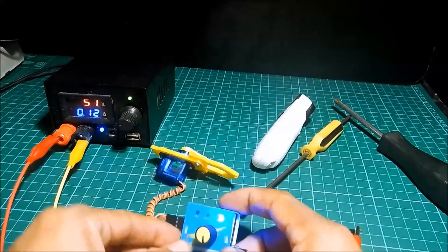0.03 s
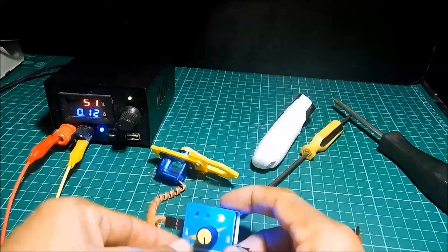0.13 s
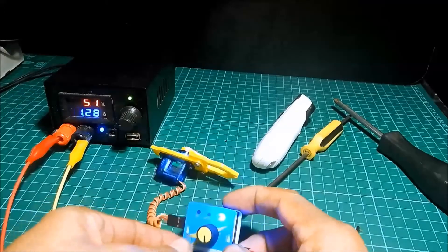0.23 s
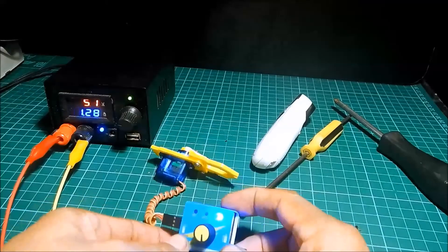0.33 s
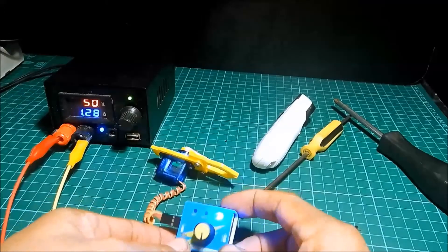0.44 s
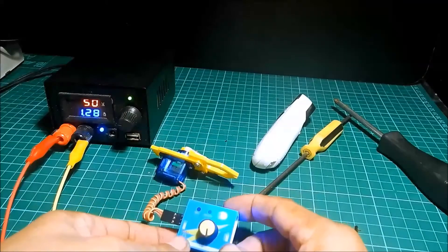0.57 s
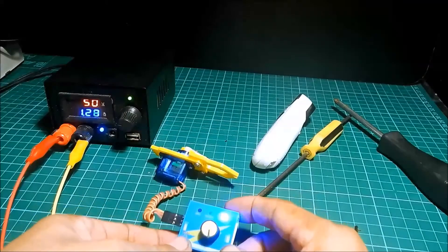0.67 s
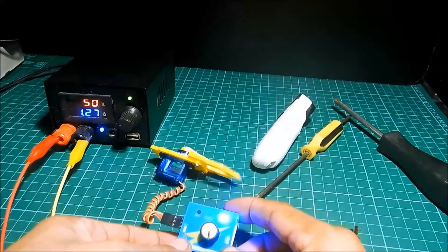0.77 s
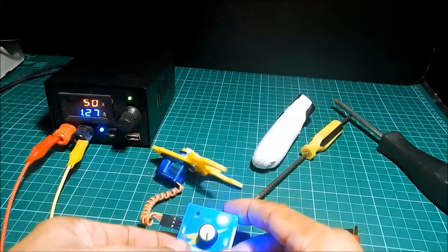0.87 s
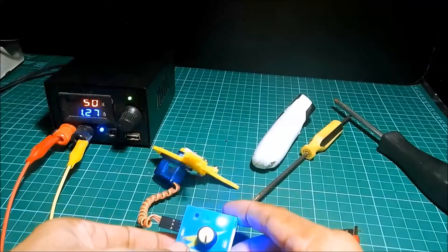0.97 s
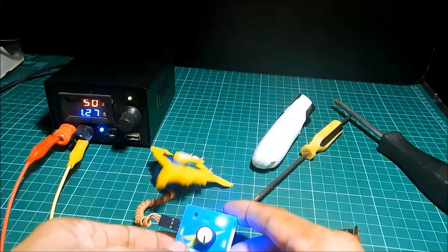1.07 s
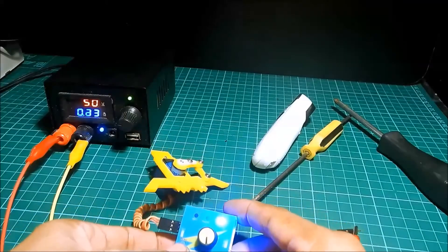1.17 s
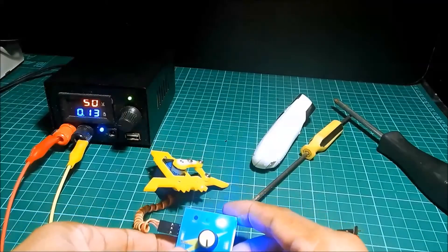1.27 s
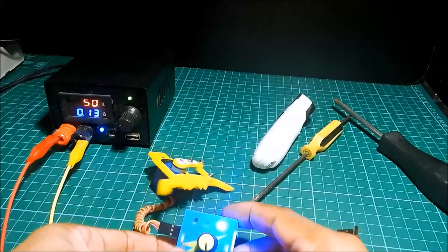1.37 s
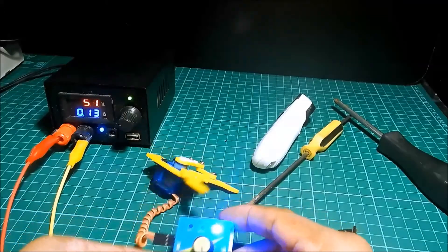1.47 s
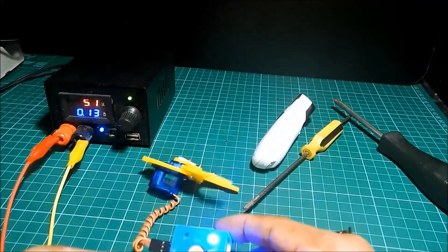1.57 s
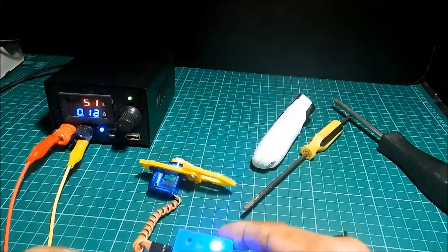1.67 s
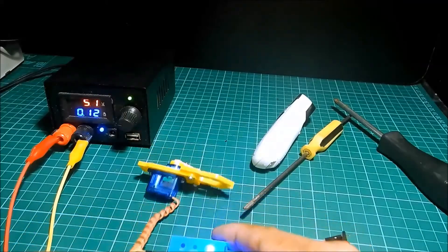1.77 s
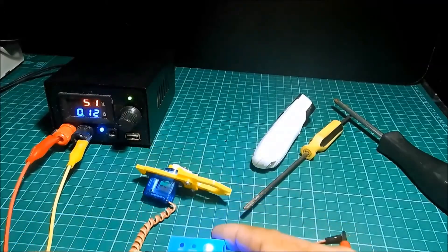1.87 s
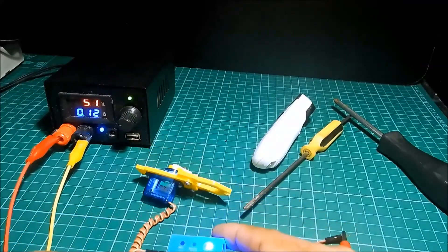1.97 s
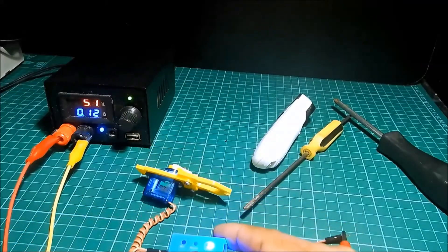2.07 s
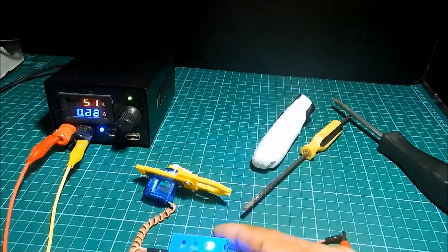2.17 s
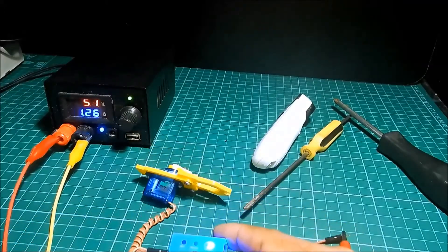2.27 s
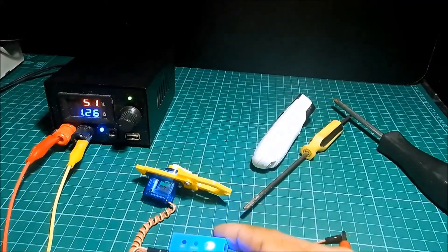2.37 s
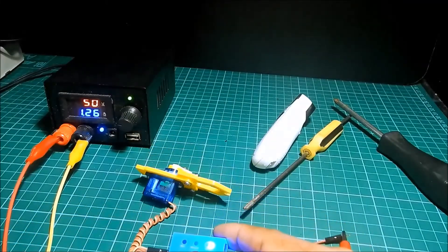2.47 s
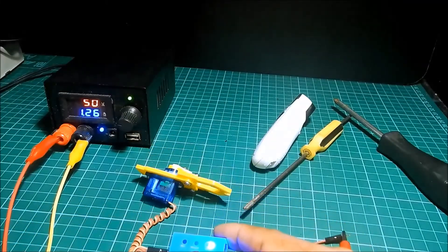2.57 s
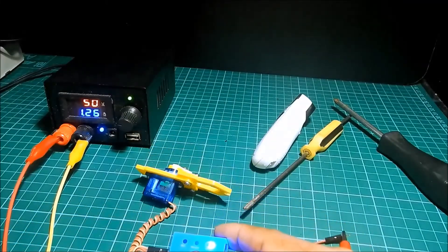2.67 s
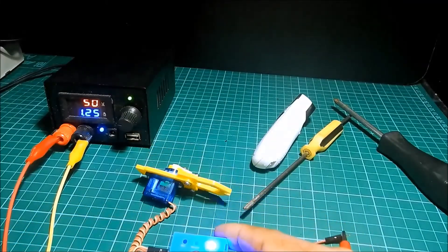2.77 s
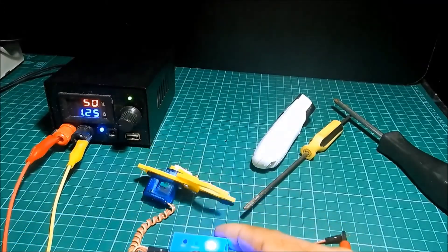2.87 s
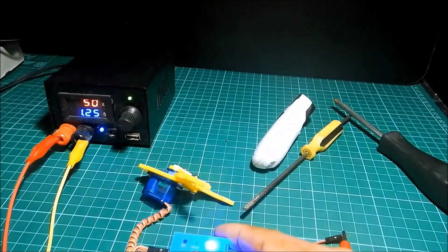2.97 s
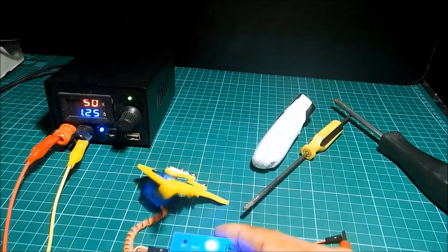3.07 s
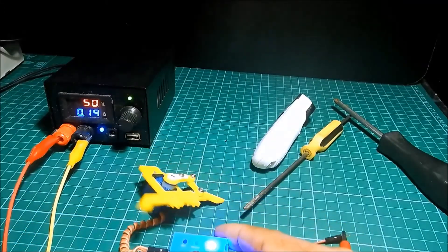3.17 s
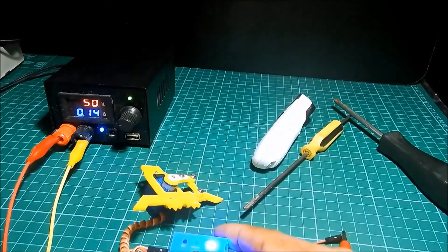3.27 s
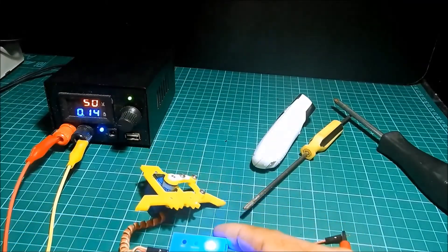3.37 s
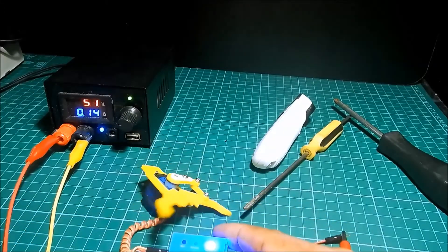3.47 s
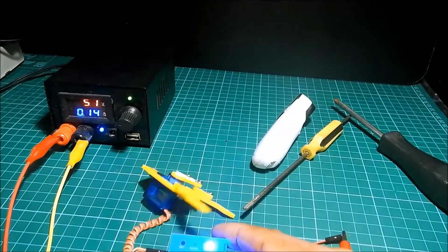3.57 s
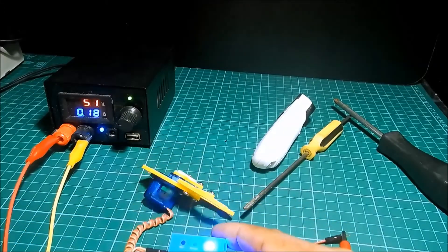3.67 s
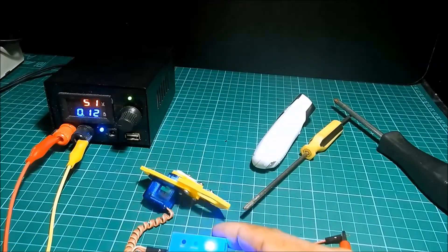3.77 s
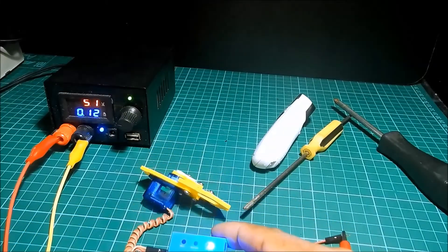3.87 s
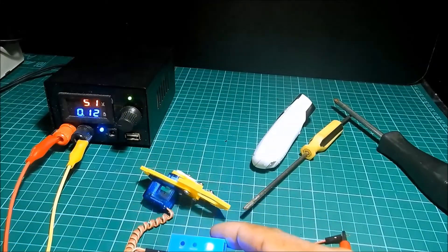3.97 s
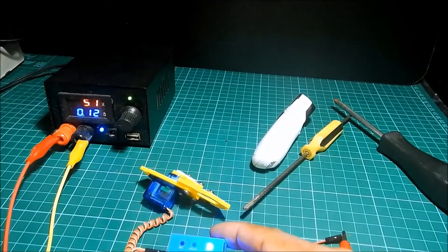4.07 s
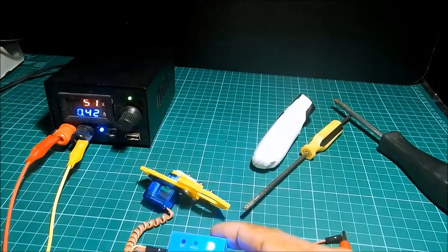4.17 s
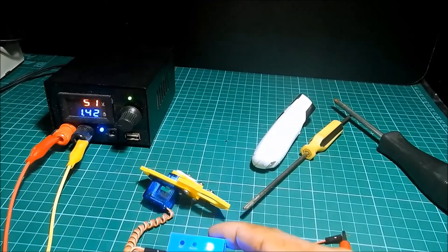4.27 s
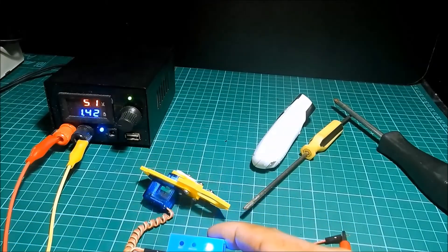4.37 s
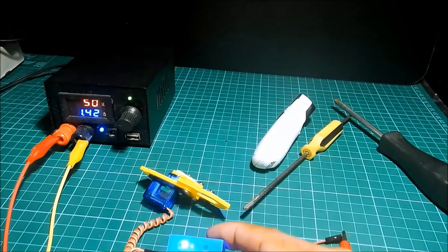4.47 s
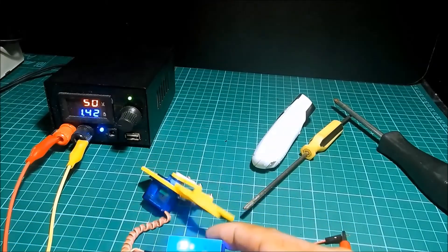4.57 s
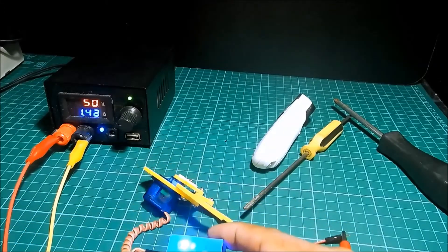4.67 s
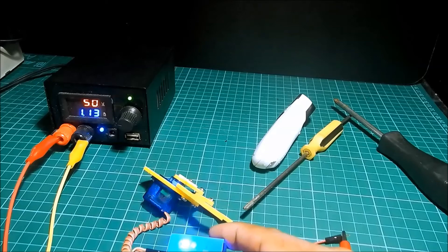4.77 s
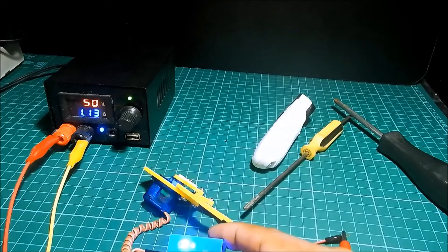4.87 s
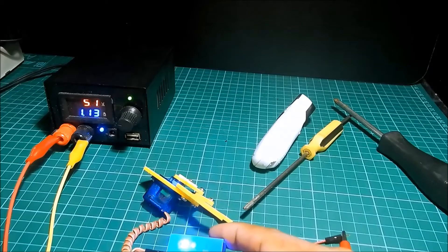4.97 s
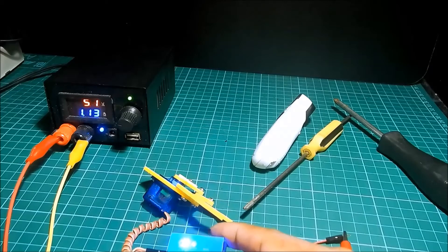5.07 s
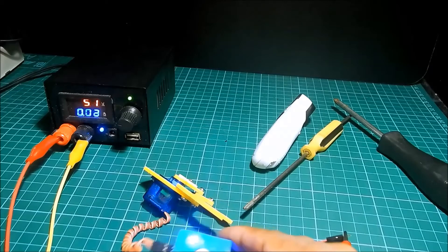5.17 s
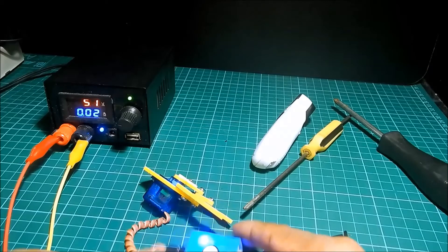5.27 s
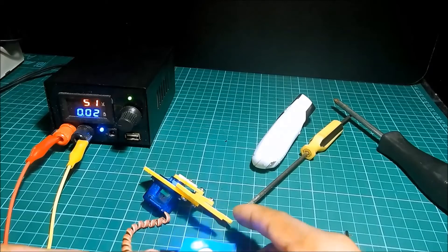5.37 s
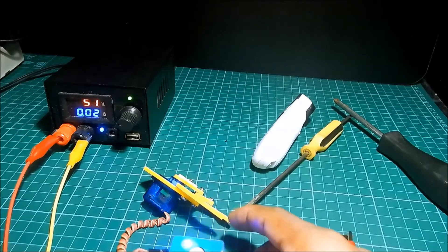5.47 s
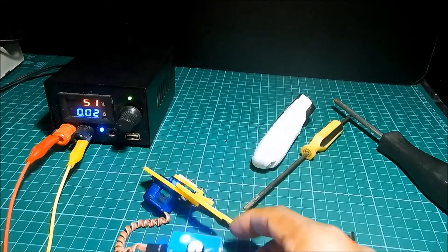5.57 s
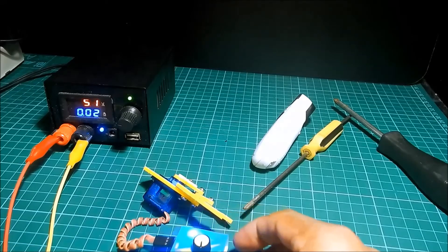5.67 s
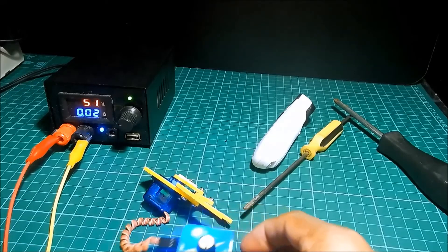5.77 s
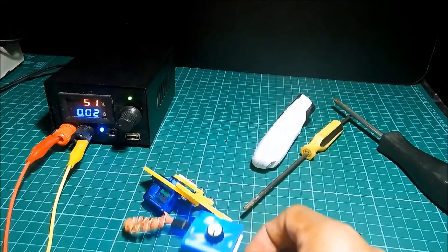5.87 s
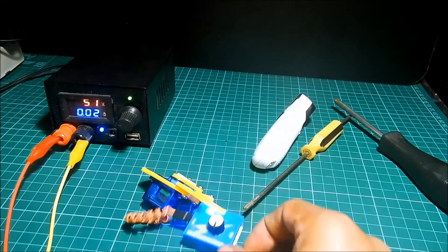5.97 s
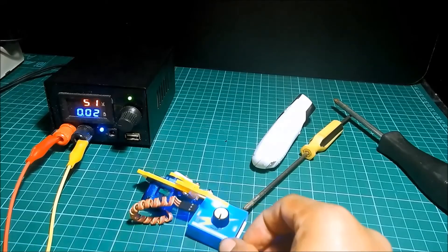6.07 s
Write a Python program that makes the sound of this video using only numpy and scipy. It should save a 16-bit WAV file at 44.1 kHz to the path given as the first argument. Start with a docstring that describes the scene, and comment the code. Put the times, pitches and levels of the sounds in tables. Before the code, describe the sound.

Short raspy gear whirs and plastic clacks from a small motorised gripper on a matted bench, with finger ticks and a faint fan hum.

```python
"""A hobby servo opens and shuts a plastic gripper on a mat-covered bench, near the middle of a stereo microphone.
Its gears are dense random tooth contacts ringing the case, with scrapes and scuffs on the mat.
Jaws snap and fingers tick on a control box as struck plastic modes; soft pushes knock through the bench.
Fingers rustle as filtered grit. A small quiet room answers with dying noise; a supply fan, room noise
and a wavering low hum, all shaped random noise, lie underneath."""
import sys
import numpy as np
from scipy import signal
from scipy.fft import rfft, irfft
from scipy.io import wavfile

SR = 44100
rng = np.random.default_rng(int(sys.argv[2]) if len(sys.argv) > 2 else 0)


def waveform_to_disk(signal):
    """Save audio, clipped to [-1, 1], as 16-bit WAV at the path in sys.argv[1]."""
    frames = np.transpose(np.atleast_2d(signal))
    scaled = np.clip(frames, -1, 1) * 32767
    samples = np.round(scaled).astype(np.int16)
    wavfile.write(sys.argv[1], SR, samples)


N = 269887
T = np.arange(N) / SR
HZ = np.maximum(np.fft.rfftfreq(N + 4096, 1 / SR), 10)

# Fan and room noise. Each row: frequency in Hz, relative level in dB per Hz.
AIR_SPECTRUM = [(21, -32.5), (35, -2.5), (108, -3.5), (216, -6.5), (490, -17), (602, -19), (840, -19),
                (979, -19), (1590, -19), (2800, -33), (4010, -32.5), (4680, -30.5), (6520, -49.5),
                (16000, -68)]
# Resonances of the fan housing. Each row: frequency in Hz, width in Hz, boost in dB.
HOUSING_PEAKS = [(511, 81, 5.5), (815, 26.6, 5), (1656, 130, 5.5), (2760, 380, 14), (4810, 560, 4)]
# How alike the air noise is left and right. Each row: frequency in Hz, likeness (below 0 is taken as 0).
AIR_LIKENESS = [(60, 0.71), (180, 0.5), (550, 0.51), (1650, 0.78), (4970, -0.12), (15000, -0.03)]
# Lean of the air noise. Each row: frequency in Hz, left minus right in dB.
AIR_BALANCE = [(60, -9), (240, -5), (950, -2.5), (3770, 2.5), (15000, -3)]
# Wavering low hum. Each row: time in seconds, level in dB.
HUM_LEVEL = [(0, -81), (.45, -78), (.7, -55), (.87, -54.5), (1.05, -60.5), (1.3, -50), (1.5, -59.5),
             (1.62, -56), (1.85, -59.5), (2.45, -73.5), (2.74, -60), (3.12, -68), (3.46, -51.5),
             (4.25, -57), (4.6, -59.5), (4.96, -57.5), (5.25, -52), (5.45, -53.5), (5.75, -62.5),
             (6.12, -55)]
# Spacing of the microphone ports. Each row: frequency in Hz, lead of the left port in radians.
PORT_LEAD = [(500, .05), (3000, .4), (6500, .6), (8500, 1.2), (12000, 1.4), (16000, 1.4)]
# Fingers rustling. Each row: start in seconds, end in seconds, level in dB, brightest pitch in Hz.
RUSTLES = [(0, 0.122, -68, 4720), (0.155, 0.18, -72.5, 5330), (4.274, 4.423, -70, 4820),
           (4.28, 4.356, -75.5, 3470), (4.806, 4.957, -73, 4300), (5.19, 5.225, -74, 4930),
           (5.295, 5.355, -71, 4300), (5.424, 5.6, -67.5, 4720), (5.598, 5.76, -79.5, 5600),
           (5.855, 5.986, -70.5, 5070), (6.03, 6.12, -69.5, 4270)]
# Colour of skin grit. Each row: frequency in Hz, relative level in dB per Hz.
RUSTLE_SPECTRUM = [(1470, -66), (2500, 1.5), (3340, 5), (3840, -8), (4780, -13), (5130, -12.5), (6280, -19),
                   (9000, -58), (11700, -70), (19800, -120)]
# Knocks through the bench. Each row: start in seconds, peak in dB before the bass cut, pitch in Hz.
KNOCKS = [(0.278, -39, 214), (.866, -38, 174), (.9, -34.5, 285), (0.967, -43, 221), (1.194, -30, 216),
          (1.237, -29, 238), (1.266, -36, 192), (1.407, -36, 176), (1.519, -39, 194), (1.617, -33.5, 191),
          (1.669, -37, 236), (1.703, -31.5, 235), (1.782, -32.5, 208), (1.738, -42, 230), (1.812, -41, 215),
          (1.901, -40, 213), (1.936, -38, 202), (2.68, -47, 407), (2.7, -44.5, 180), (2.922, -39, 256),
          (2.952, -34.5, 245), (2.985, -35.5, 189), (3.029, -39.5, 188), (3.231, -36.5, 236),
          (3.275, -26, 217), (3.309, -58, 218), (3.463, -38.5, 210), (3.639, -39.5, 190), (3.672, -33, 198),
          (3.752, -31.5, 233), (3.89, -41, 189), (4.624, -27.5, 232), (4.678, -31, 213),
          (4.718, -27.5, 186), (4.771, -44.5, 183), (5.397, -39, 180)]
# Fingers on the control box. Each row: contact in seconds, peak in dB, brightest pitch in Hz.
TICKS = [(.2379, -45, 1540), (.2578, -44.5, 2280), (.28, -44, 2320), (.5756, -54.5, 4330),
         (.7776, -50.5, 2770), (4.458, -51, 4860), (5.386, -39.5, 2500), (5.404, -46, 2480),
         (5.449, -38, 3400), (5.481, -45, 3440), (5.5024, -49, 3540), (5.709, -51, 3460),
         (5.854, -51, 4500), (5.899, -52, 4520), (6.0288, -36.5, 3000), (6.0399, -40, 3320)]
# Modes of the control box. Each row: frequency in Hz, level in dB, undamped T60 in seconds.
BOX_MODES = [(1200, -21, 0.0023), (1530, 10.5, 0.00375), (2210, -13, 0.013), (2640, 10, 0.0046),
             (3180, 0.5, 0.019), (3560, 7.5, 0.0063), (4550, 3, 0.011), (4860, 0.5, 0.0095),
             (6250, -51, 0.0014), (7600, -30, .003), (11500, -36.5, 0.0025)]
# Push button of the box, a hard click. Each row: contact in seconds, peak in dB, a pitch in Hz (no effect).
BUTTON_PRESSES = [(4.571, -10.5, 4000)]
# Modes of the button cap. Each row: frequency in Hz, level in dB, T60 in seconds.
BUTTON_MODES = [(1950, -7.5, 0.0089), (2750, -9, 0.0065), (3400, -4.5, 0.0087), (3950, 1, 0.006),
                (4800, 1, 0.0042), (5600, -8.5, 0.0053), (7500, -25.5, .003), (11500, -21.5, 0.0022)]
# Jaws snapping. Each row: contact in seconds, peak in dB, brightest pitch in Hz.
SNAPS = [(.9022, -18, 1750), (.9682, -38.5, 1400), (1.1943, -39, 1490), (1.2362, -38.5, 1180),
         (1.2594, -36.5, 3000), (1.405, -39, 1390), (1.617, -43.5, 1260), (1.7005, -29.5, 1800),
         (2.9542, -16, 1810), (3.025, -41, 1200), (3.126, -43.5, 1500), (3.2728, -37, 1120),
         (3.3025, -39.5, 2890), (3.677, -45, 1400), (3.7558, -33.5, 1940), (3.8338, -29.5, 4320),
         (4.6353, -7.5, 2230), (4.715, -27, 1620), (4.721, -23.5, 4060)]
# Modes of the jaws. Each row: frequency in Hz, level in dB, undamped T60 in seconds.
JAW_MODES = [(556, -14, 0.06), (820, -10, 0.02), (1160, -5.5, 0.02), (1493, 7, 0.02), (1820, 3.5, 0.013),
             (2550, 9.5, 0.0049), (2765, -4, 0.041), (3580, 13.5, 0.0054), (4120, -3.5, 0.012),
             (4510, 5, 0.031), (5340, -27, .01), (7000, -29, .01)]
# Servo moves. Each row: full speed in seconds, stop in seconds, whir in dB at start and at stop,
# lower case resonance in Hz at start and at stop, upper one in Hz at start and at stop, upper level in dB,
# gear hiss in dB against the whir, scrape of the jaws in dB, scuff of the case in dB.
MOVES = [(0.838, 1.25, -50, -58.5, 5020, 4830, 6585, 6800, 0.5, -4, -67, -83),
         (1.387, 1.795, -52.5, -48, 4920, 4930, 6710, 6490, -1.5, -6.5, -65.5, -60.5),
         (2.887, 3.312, -54, -52.5, 4880, 4660, 6340, 6700, -8.5, -6, -69, -82),
         (3.437, 3.86, -54, -50.5, 4750, 4800, 6560, 6630, -4.5, -5, -62.5, -68),
         (4.616, 4.701, -55.5, -49, 4840, 4700, 7000, 4200, -6, -1, -52.5, -66)]
# Gears straining for an instant. Each row: middle in seconds, level in dB, length in seconds,
# bright bite of the loaded teeth in dB against that level.
STRAINS = [(.84, -56, 0.04, -32), (0.876, -35.5, 0.027, -23), (.933, -47.5, 0.014, -33),
           (0.949, -58, .02, -31), (1.025, -58.5, 0.033, -42), (1.18, -54.5, 0.058, -35),
           (1.274, -54, .05, -28), (1.408, -60.5, 0.056, -37), (1.52, -56, 0.054, -44),
           (1.761, -43.5, 0.011, -40), (1.786, -44, .02, -16), (2.89, -49, 0.043, -45),
           (2.93, -39, 0.051, -40), (2.996, -48.5, 0.044, -34), (3.047, -54, 0.012, -33),
           (3.095, -61, 0.024, -32), (3.133, -53.5, 0.04, -30), (3.168, -47, 0.024, -30),
           (3.201, -46, 0.0077, -33), (3.328, -58, 0.033, -20), (3.461, -49.5, 0.032, -36),
           (3.585, -58, 0.056, -30), (3.81, -46, 0.039, -36), (3.842, -40.5, .022, -14.5),
           (3.854, -47.5, 0.0087, -26), (4.605, -39, .024, -20), (4.63, -31.5, 0.036, -15),
           (4.721, -41.5, 0.023, -19)]
# Weaker case resonances, lying flat and then shifted on the mat.
# Each row: frequency in Hz, width of each smoothing in Hz, level in dB.
CASE_FLAT = [(3430, 300, -14), (4300, 500, -13), (5600, 300, -11), (7950, 400, -19)]
CASE_SHIFTED = [(3450, 400, -16), (5450, 300, -11), (6900, 250, -14), (7700, 600, -18)]
# Broad hiss of the gears. Each row: frequency in Hz, relative level in dB per Hz.
GEAR_HISS = [(1500, -11), (2500, -8), (4000, -3.5), (7000, -4), (8300, -16.5), (9800, -21.5), (12500, -34),
             (15500, -34)]
# The whole servo skidding on the mat. Each row: start in seconds, end in seconds, bright scrape in dB,
# dull scuff in dB.
SKIDS = [(0.88, 0.914, -59, -53.5), (1.874, 1.944, -56, -51.5), (2.528, 2.576, -66.5, -74),
         (2.708, 2.713, -58, -57), (3.28, 3.33, -75, -55.5)]
# Colours of scrape and scuff on the mat. Each row: frequency in Hz, relative level in dB per Hz.
SCRAPE_SPECTRUM = [(550, -2), (1020, -7), (1450, 6), (1900, -3.5), (2500, -20), (3500, -12.5),
                   (8000, -77.5)]
SCUFF_SPECTRUM = [(90, -38.5), (230, 15), (340, 8), (420, -19), (600, 1), (900, -27), (4000, -76)]

AIR_DB, HUM_HZ, HUM_T60_S = -56, 143, 1.3 / 24
ROOM_T60_S, ROOM_DB, GEAR_ROOM_DB = 0.29, -16.5, -17.5
WALL_CUT_HZ, GEAR_WALL_CUT_HZ = 2000, 12000
CUTOFF_HZ = 16000   # 70 dB down from here up
RUSTLE_IN_DB_PER_S, RUSTLE_OUT_DB_PER_S, RUSTLE_WIDTH_HZ = 206.5, 88.5, 900
BENCH_T60_S, BENCH_CUT_HZ = 0.049, 176
STRIKE_DELAY_S = 0.001222   # from contact to the start of the sound
SPIN_UP_DB_PER_S, RUN_DOWN_DB_PER_S = 701, 227
SKID_IN_DB_PER_S, SKID_OUT_DB_PER_S = 208.5, 314
TEETH_PER_S, DRIVE_HZ, DRIVE_DEPTH_DB = 1900, 48.8, 2.5
LOWER_WIDTH_HZ, UPPER_WIDTH_HZ, WANDER_HZ = 330, 180, 50
SHIFT_S = 2.4   # the case lies differently from here on


def from_db(db):
    """Decibels to gain."""
    return 10 ** (np.asarray(db) / 20)


def rms_one(x):
    """Scale a sound to unit rms."""
    return x / np.sqrt(np.mean(x ** 2) + 1e-20)


def in_time(rows):
    """Read each column of a curve at every sample."""
    s, *columns = np.transpose(rows)
    return [np.interp(T, s, c) for c in columns]


def at_hz(points):
    """Read a spectrum table on the frequency grid, along log frequency."""
    hz, values = np.transpose(points)
    return np.interp(np.log(HZ), np.log(hz), values)


def colour(x, gain):
    """Filter a sound by a gain on the frequency grid."""
    return irfft(rfft(x, N + 4096) * gain, N + 4096)[..., :N]


def drift(rate_hz):
    """Slow random wandering of spread 1: noise smoothed by two equal poles."""
    r = np.exp(-2 * np.pi * rate_hz / SR)
    noise = rng.standard_normal(N + SR)
    return rms_one(signal.lfilter([1], [1, -2 * r, r * r], noise)[SR:])


def ring(x, hz, t60):
    """A damped mode: a unit click sets a sine of height 1 ringing, for a T60 of at least 2 ms."""
    r, w = from_db(-60 / (max(t60, .002) * SR)), 2 * np.pi * hz / SR
    return signal.lfilter([0, np.sin(w)], [1, -2 * r * np.cos(w), r * r], x)


def moving_ring(x, hz, width_hz):
    """A steep resonance of gain 1 whose centre follows a curve: shift down, smooth twice, shift back."""
    turn = np.exp(2j * np.pi * np.cumsum(hz) / SR)
    r = np.exp(-np.pi * width_hz / SR)
    smooth = signal.lfilter([(1 - r) ** 2], [1, -2 * r, r * r], x / turn)
    return 2 * (smooth * turn).imag


def swell(start, stop, in_db_per_s, out_db_per_s):
    """Gain that rises to 1 at start, holds, and dies away after stop."""
    before, after = np.maximum(start - T, 0), np.maximum(T - stop, 0)
    return from_db(-in_db_per_s * before - out_db_per_s * after)


def grit(per_s, spread_db):
    """Dense tiny contacts of uneven size and random sign, at random moments."""
    sizes = from_db(spread_db * np.minimum(rng.exponential(1, N), 4))
    signs = rng.choice([-1, 1], N)
    return sizes * signs * (rng.random(N) < per_s / SR)


def add(out, s, sound):
    """Mix a sound in from time s."""
    i = round(s * SR)
    out[i:i + len(sound)] += sound[:N - i]


def lean_right(x, db):
    """Place a sound off centre: down by db on the left, up by db on the right."""
    return x * from_db([[-db], [db]])


def background():
    """Fan and room noise spread wide by its left-right likeness, over a narrow noise band as hum."""
    mid, side = rng.standard_normal((2, N))
    alike = np.clip(at_hz(AIR_LIKENESS), 0, 1)
    mid, side = colour(mid, np.sqrt(1 + alike)), colour(side, np.sqrt(1 - alike))
    housing_db = sum(db / (1 + (2 * (HZ - hz) / width) ** 2) for hz, width, db in HOUSING_PEAKS)
    gain = from_db(at_hz(AIR_SPECTRUM) + housing_db)
    lean = from_db(at_hz(AIR_BALANCE) / 2 * np.array([[1], [-1]]))
    air = rms_one(colour(np.array([mid + side, mid - side]), gain * lean))
    hum_db, = in_time(HUM_LEVEL)
    hum = rms_one(ring(rng.standard_normal(N), HUM_HZ, HUM_T60_S))
    return from_db(AIR_DB) * air + from_db(hum_db) * hum


def room(x, cut_hz):
    """The walls answer with dying noise, partly shared between left and right, dulled above the cut."""
    t = T[:round(SR * .8)]
    envelope = from_db(-60 * t / ROOM_T60_S) * (1 - np.exp(-t / 0.0011))
    tail = rng.standard_normal((2, len(t))) * envelope
    tail = signal.sosfilt(signal.butter(1, [150, cut_hz], "band", fs=SR, output="sos"), tail)
    shared = tail + 0.56 * tail[::-1]
    shared = shared / np.sqrt((shared ** 2).sum(axis=1, keepdims=True))
    return signal.fftconvolve(x[None], shared, axes=1)[:, :N]


def fingers():
    """Fine grit under skin; each rustle passes a resonance at a pitch of its own."""
    grains = grit(3000, spread_db=1.5) * from_db(1.5 * drift(18))
    grains = colour(grains, from_db(at_hz(RUSTLE_SPECTRUM)))
    out = np.zeros(N)
    for start, end, db, hz in RUSTLES:
        rustle = rms_one(moving_ring(grains, np.full(N, hz), RUSTLE_WIDTH_HZ))
        out += from_db(db) * swell(start, end, RUSTLE_IN_DB_PER_S, RUSTLE_OUT_DB_PER_S) * rustle
    return out


def bench():
    """Soft pushes of about half a cycle ring the bench top, which radiates no deep bass."""
    out = np.zeros(N)
    for s, peak_db, hz in KNOCKS:
        push = np.pad(np.hanning(round(SR / hz * 0.55)), (0, SR // 4))
        sound = ring(push, hz, BENCH_T60_S)
        add(out, s, from_db(peak_db) * sound / np.abs(sound).max())
    return signal.sosfilt(signal.butter(4, BENCH_CUT_HZ, "high", fs=SR, output="sos"), out)


def strikes(events, modes, rattle_db, rattle_s, focus_db, damping, cut_hz):
    """A sharp contact and a dying rattle strike plastic modes; focus_db favours those near the brightest pitch."""
    out, t = np.zeros(N), T[:SR // 10]
    # small, yielding parts: no bass, no extreme treble
    soft = signal.butter(2, [480, cut_hz], "band", fs=SR, output="sos")
    for s, peak_db, bright_hz in events:
        force = from_db(rattle_db) * rng.standard_normal(len(t)) * np.exp(-t / rattle_s)
        force[0] = -1
        sound = np.zeros(len(t))
        for k, (hz, db, t60) in enumerate(modes):
            octaves_off = np.log2(hz / bright_hz)
            level_db = db + rng.normal(0, 1.5) - focus_db * octaves_off ** 2
            sound += (-1) ** k * from_db(level_db) * ring(force, hz, t60 / damping)
        sound = signal.sosfilt(soft, sound)
        add(out, s + STRIKE_DELAY_S, from_db(peak_db) * sound / np.abs(sound).max())
    return out


def control_box():
    """Fingertips strike the damped box, and the push button clicks with a less damped, brighter cap."""
    ticks = strikes(TICKS, BOX_MODES, rattle_db=-13, rattle_s=.0021, focus_db=8, damping=1.1, cut_hz=6000)
    return ticks + strikes(BUTTON_PRESSES, BUTTON_MODES, rattle_db=-20, rattle_s=.0017,
                           focus_db=0, damping=1, cut_hz=12000)


def gripper_jaws():
    """The plastic jaws snap: brief contacts with a short rattle on damped modes."""
    return strikes(SNAPS, JAW_MODES, rattle_db=-21.5, rattle_s=0.0047, focus_db=4.5, damping=1.5, cut_hz=6000)


def case_modes(teeth, modes):
    """Fixed weaker resonances of the case, rung by the teeth."""
    return sum(from_db(db) * moving_ring(teeth, np.full(N, hz), width) for hz, width, db in modes)


def servo():
    """Tooth contacts, pushed by the drive pulses, ring the case; jaws and case rub on the mat."""
    start, stop, db_a, db_b, low_a, low_b, up_a, up_b, up_db, hiss_db, scrape_db, scuff_db = np.transpose(MOVES)
    pairs = ((start, stop), (db_a, db_b), (low_a, low_b), (up_a, up_b), (up_db, up_db), (hiss_db, hiss_db))
    curves = [np.ravel(pair, "F") for pair in pairs]   # start and stop values in turn
    whir_db, lower_hz, upper_hz, upper_db, hiss_db = in_time(np.transpose(curves))
    moving = np.array([swell(a, b, SPIN_UP_DB_PER_S, RUN_DOWN_DB_PER_S) for a, b in zip(start, stop)])
    whir = from_db(whir_db) * moving.sum(axis=0)

    strain, bite = np.zeros(N), np.zeros(N)
    for s, db, length, bite_db in STRAINS:
        hump = np.hanning(round(length * SR))
        add(strain, s - length / 2, from_db(db) * hump)
        add(bite, s - length / 2, from_db(db + bite_db) * hump)

    drive = from_db(DRIVE_DEPTH_DB * np.sin(2 * np.pi * DRIVE_HZ * T) + 1.3 * drift(6.4))
    teeth = grit(TEETH_PER_S, spread_db=-2.0) * drive
    case = moving_ring(teeth, lower_hz + WANDER_HZ * drift(5.1), LOWER_WIDTH_HZ)
    case -= moving_ring(teeth, upper_hz + WANDER_HZ * drift(8.75), UPPER_WIDTH_HZ) * from_db(upper_db)
    case += np.where(T < SHIFT_S, case_modes(teeth, CASE_FLAT), case_modes(teeth, CASE_SHIFTED))

    # faster gear stages hiss
    hiss = rms_one(colour(grit(4000, spread_db=2.5) * drive, from_db(at_hz(GEAR_HISS))))
    sizzle = rms_one(signal.sosfilt(signal.butter(4, 11500, "high", fs=SR, output="sos"), hiss))
    gears = (whir + strain) * rms_one(case)
    gears += from_db(hiss_db) * (whir + from_db(-2.0) * strain) * hiss
    gears += bite * sizzle   # loaded teeth bite brighter

    skid_start, skid_end, skid_scrape_db, skid_scuff_db = np.transpose(SKIDS)
    skidding = np.array([swell(a, b, SKID_IN_DB_PER_S, SKID_OUT_DB_PER_S) for a, b in zip(skid_start, skid_end)])
    scrape = from_db(scrape_db) @ moving + from_db(skid_scrape_db) @ skidding
    scuff = from_db(scuff_db) @ moving + from_db(skid_scuff_db) @ skidding
    mat = grit(2500, spread_db=3.0) * from_db(3 * drift(30))
    gears += scrape * rms_one(colour(mat, from_db(at_hz(SCRAPE_SPECTRUM))))
    return gears + scuff * rms_one(colour(mat, from_db(at_hz(SCUFF_SPECTRUM))))


def scene():
    """Servo, jaws, bench and fingers a touch right of the middle, in the room, over the background."""
    gears, jaws, ticks, knocks = servo(), gripper_jaws(), control_box(), bench()
    near = lean_right(gears, .3) + lean_right(jaws, .5) + lean_right(ticks, .2) + lean_right(knocks, .8)
    # the two microphone ports hear these a little apart
    near = colour(near, np.exp(.5j * at_hz(PORT_LEAD) * np.array([[1], [-1]])))
    near = near + lean_right(fingers(), .3)
    walls = from_db(ROOM_DB) * room(jaws + ticks + knocks, WALL_CUT_HZ)
    walls += from_db(GEAR_ROOM_DB) * room(gears, GEAR_WALL_CUT_HZ)
    return near + walls + background()


def record(dry):
    """The microphone drops the deepest bass; the top is cut steeply."""
    dry = signal.sosfilt(signal.butter(2, 42, "high", fs=SR, output="sos"), dry)
    return signal.sosfilt(signal.cheby2(12, 70, CUTOFF_HZ, fs=SR, output="sos"), dry)


dry = scene()
out = record(dry)
waveform_to_disk(out)
```